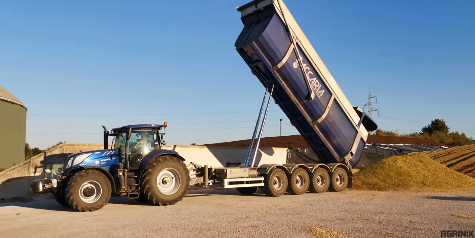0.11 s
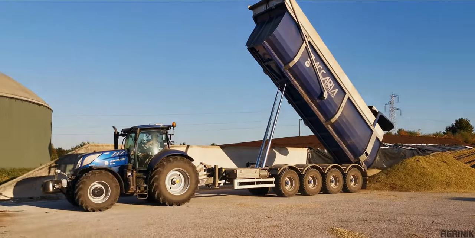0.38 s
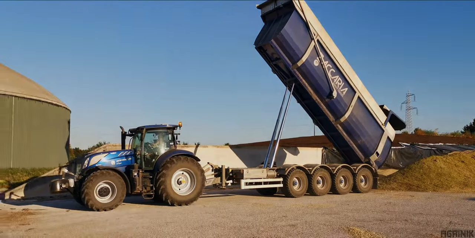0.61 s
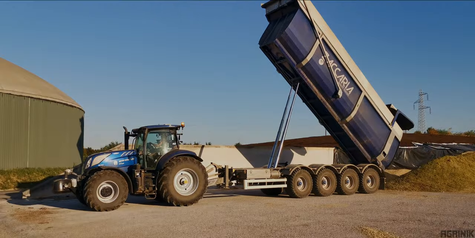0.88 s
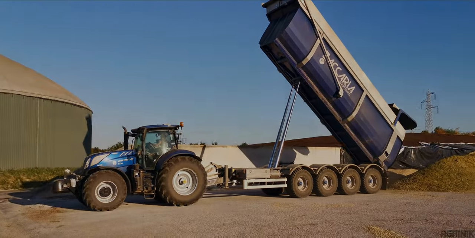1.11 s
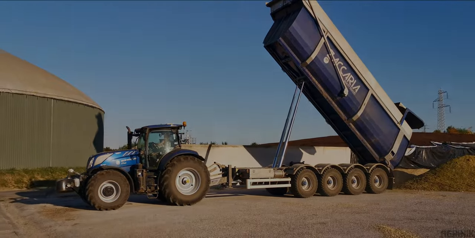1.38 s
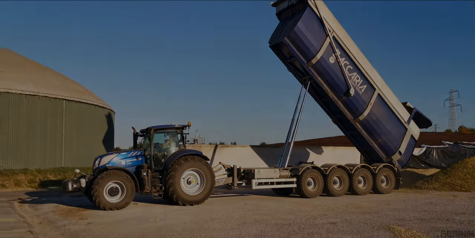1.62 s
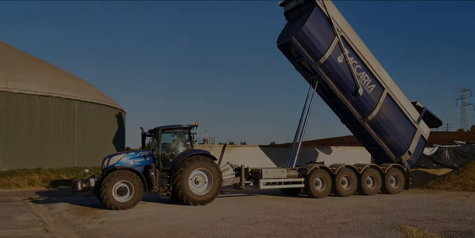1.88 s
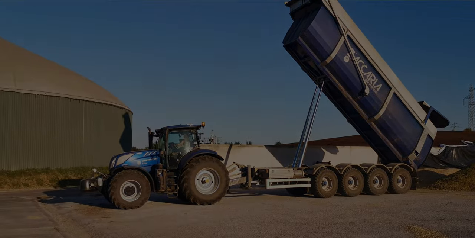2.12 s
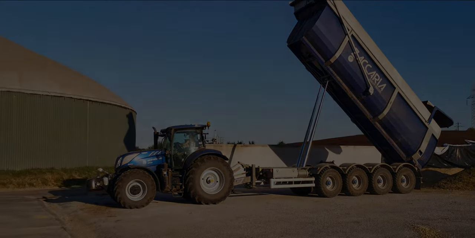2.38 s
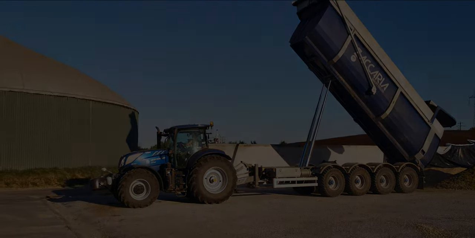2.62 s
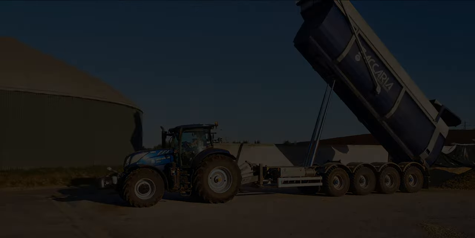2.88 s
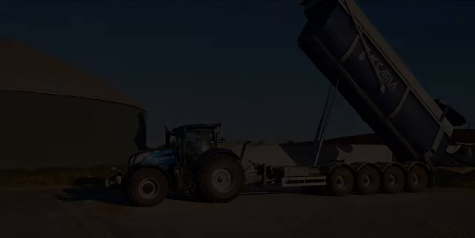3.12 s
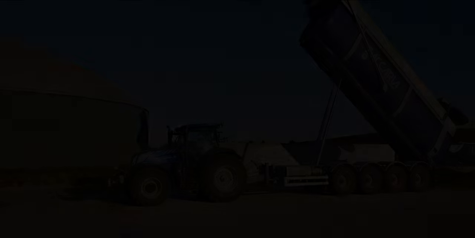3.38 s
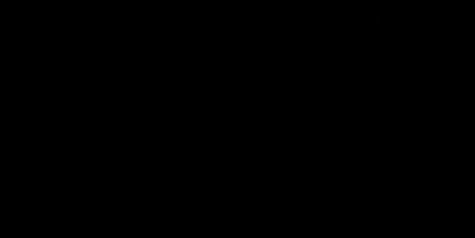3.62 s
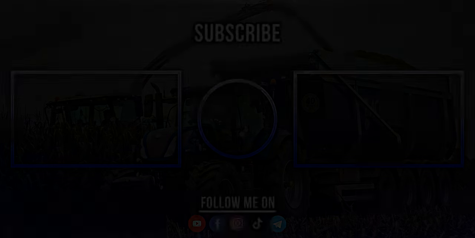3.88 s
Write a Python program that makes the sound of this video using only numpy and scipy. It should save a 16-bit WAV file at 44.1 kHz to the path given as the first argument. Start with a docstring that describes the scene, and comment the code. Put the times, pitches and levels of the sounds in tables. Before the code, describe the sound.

A tractor diesel engine revs up from idle to a deep roar, then fades to silence

```python
"""An open yard: a six-cylinder diesel tractor revs up from idle and pulls away with its trailer.
Sine-tone exhaust beats rise over a filtered-noise roar with pipe resonances, block clatter with ringing
panels and turbo hiss. A two-tone hum keeps its own pitch; narrow whines, low surges, bright rushes and
a faint top hiss fill in. The fader closes along a curve to silence."""
import sys
import numpy as np
from scipy import signal
from scipy.io import wavfile
from scipy.ndimage import uniform_filter1d

SR = 44100
rng = np.random.default_rng(int(sys.argv[2]) if len(sys.argv) > 2 else 0)


def generate_wav(sig):
    """Save sig (samples, or channels by samples) to the path in sys.argv[1] as 16-bit PCM at SR."""
    pcm = np.round(np.clip(np.atleast_2d(sig).T, -1, 1) * 32767).astype(np.int16)
    wavfile.write(sys.argv[1], SR, pcm)


def natural_amplitude(level_db):
    """Convert a level in decibels to a linear amplitude factor, elementwise."""
    exponent = np.asarray(level_db, float) / 20
    return 10 ** exponent


N = 176400  # 4 s

# engine run: t/s, mean firing rate f/Hz, exhaust beat level/dB, its octave level/dB, load/0-1, clatter gain/dB
ENGINE_RUN = [(0, 44.1, -35, -33, 0.03, -1), (.3, 43.65, -28, -32.5, 0.22, -1.5),
              (.42, 45.05, -23.5, -44, 0.16, -0.5), (.55, 47.45, -31, -36, 0.05, 0.5),
              (.78, 48.1, -37, -46, 0.24, 0), (.92, 49.34, -26.5, -32.5, 0.25, 0),
              (1.05, 53.6, -17.5, -16, 0.31, -1.5), (1.17, 58.54, -18.5, -15, 0.2, -1),
              (1.2, 60.5, -29, -16, 0.7, -2), (1.23, 61.66, -29, -14.5, 0.6, -1),
              (1.27, 64.4, -18.5, -21.5, 0.54, -2), (1.32, 66.13, -17, -29, 0.44, -2),
              (1.37, 70.22, -35.5, -20, 0.5, -1), (1.44, 75.2, -28.5, -22, 0.3, 0.5),
              (1.5, 78.8, -20.5, -25, 0.52, 0.5), (1.66, 80.76, -17.5, -21.5, 0.37, 0),
              (1.71, 81.3, -37.5, -28, 0.75, 0.5), (1.82, 83.86, -28.5, -37, 0.75, 0.5),
              (1.89, 86, -15.5, -38, 0.81, 1), (2.02, 88.1, -11, -18, 0.97, 1),
              (2.15, 87.8, -14, -31.5, 0.98, -1), (2.3, 91.13, -12.5, -24, 0.86, 0),
              (2.38, 90.85, -14, -22, 1, 0), (2.5, 88.9, -17, -13.5, 0.95, -1),
              (2.68, 86.34, -25.5, -40, 0.88, -0.5), (2.82, 87.65, -16, -33, 0.86, 0),
              (3.0, 86.75, -25, -17, 0.87, -1), (3.2, 87.5, -13.5, -30, 1, -0.5),
              (3.58, 85.1, -10.5, -16.5, 0.76, -2)]


def evened(x):
    """Scales to rms 1."""
    return x / np.sqrt(np.mean(x ** 2) + 1e-20)


def column(table, order, t):
    """Reads one column of a time table, with straight lines between its rows."""
    rows = np.array(table, float)
    return np.interp(t, rows[:, 0], rows[:, order])


def read(points, hz):
    """Reads a spectrum on a log-frequency axis."""
    f, value = np.transpose(points)
    return np.interp(np.log(hz + 1), np.log(f + 1), value)


def unit(points, hz):
    """Spectrum in dB, scaled to a common total power so that only its colour counts."""
    db = read(points, hz)
    return db - 10 * np.log10(np.sum(natural_amplitude(db) ** 2) * 2)


def slow(rate_hz):
    """Slow random drift of rms 1: sixteen sines up to rate_hz, the slower ones stronger."""
    t = np.arange(0, N + 256, 256) / SR
    wave = 0
    for f in np.geomspace(rate_hz / 10, rate_hz, num=16):
        wave = wave + np.sin(2 * np.pi * (f * t + rng.random())) / np.sqrt(f)
    return np.interp(np.arange(N) / SR, t, evened(wave))


def fuzzy(hz, width_hz, steady=0):
    """Noise through a triple resonance that follows the curve hz; steady 0-1 evens it towards a tone."""
    r = np.exp(-np.pi * width_hz * 1.3 / SR)  # each pass is wider, as three in a row narrow the band
    z = rng.standard_normal(len(hz)) + 1j * rng.standard_normal(len(hz))
    for _ in range(3):
        z = signal.lfilter([1 - r], [1, -r], z)
    z = z / (abs(z) + 1e-9) ** steady
    carrier = np.exp(2j * np.pi * np.cumsum(hz) / SR)
    return evened((z * carrier).real)


def noise(field_db, size, patchy_db):
    """Random short-time spectra shaped by field_db(Hz, s), with drifting patches."""
    hop = size // 4
    frames, hz = N // hop + 5, np.fft.rfftfreq(size, 1 / SR)
    real, imaginary, patches = rng.standard_normal((frames, len(hz), 3)).T
    patches = uniform_filter1d(patches, size=10, axis=0)  # across frequency
    patches = evened(uniform_filter1d(patches, size=8, axis=1))  # across time
    level_db = field_db(hz[:, None], np.arange(frames) * hop / SR) + patchy_db * patches
    z = (real + 1j * imaginary) * natural_amplitude(level_db)
    # the last factor makes up for the power lost where random frames overlap
    return signal.istft(z, nperseg=size, noverlap=size - hop)[1][:N] * np.sqrt(1.5)


def exhaust(t, firings):
    """Firing beat and octave as clean sines, with weaker upper orders that wander in level."""
    # upper orders: multiple of firing rate, level at full load and steady speed/dB
    upper_orders = [(2.5, -39), (3, -38), (3.5, -40), (4, -36), (4.5, -40), (5, -38), (6, -40)]
    idle_offset_db, wander_db = -0.5, 4.5
    rev_gain_db = .17  # per Hz/s of speed-up
    beat = natural_amplitude(column(ENGINE_RUN, 2, t)) * np.sin(2 * np.pi * firings)
    octave = natural_amplitude(column(ENGINE_RUN, 3, t)) * np.sin(4 * np.pi * firings + 1)
    out = beat + octave
    speed_up = uniform_filter1d(np.gradient(column(ENGINE_RUN, 1, t)) * SR, size=8000)  # Hz/s
    offset_db = idle_offset_db * (1 - column(ENGINE_RUN, 4, t)) + rev_gain_db * np.clip(speed_up, 0, 35)
    for k, db in upper_orders:
        level = natural_amplitude(db + offset_db + wander_db * slow(6))
        out += level * np.sin(2 * np.pi * (k * firings + rng.random()))
    return np.sqrt(2) * out  # table levels are rms


def uneven(firings):
    """Gain of the gas flow: one part of the cylinder order is stronger, and each firing differs."""
    cycle_depth, spread_db = .15, 1.2
    draws = rng.standard_normal(round(firings[-1]) + 2)
    chance = np.interp(firings, np.arange(len(draws)), draws)
    cycle = 1 + cycle_depth * np.cos(2 * np.pi * firings / 3)  # once per three firings
    return evened(natural_amplitude(spread_db * chance) * cycle)


def roar(firings):
    """Exhaust roar as noise: darker and louder under load, puffing with each firing."""
    # colour of the roar at idle: f/Hz, relative level per Hz/dB
    roar_idle = [(15, -33.5), (25, 3), (76, -6), (119, 7), (195, -7), (245, 0), (378, -7), (492, -7),
                 (757, -7.5), (1000, -11.5), (1300, -45.5), (2200, -120)]
    # colour of the roar at full load: f/Hz, relative level per Hz/dB
    roar_load = [(15, -60), (25, -22), (60, -16), (91, -5.5), (134, -6), (253, -6), (314, -5.5),
                 (462, -12.5), (669, -16.5), (1000, -21.5), (1300, -52), (2200, -120)]
    idle_db, load_db, puff_depth = -23, -9.5, .1

    def field(hz, s):
        load = column(ENGINE_RUN, 4, s)
        return (1 - load) * (unit(roar_idle, hz) + idle_db) + load * (unit(roar_load, hz) + load_db)

    puffs = 1 + puff_depth * np.cos(2 * np.pi * firings)
    return noise(field, size=2048, patchy_db=0.5) * puffs


def pipe(t):
    """Resonances of the exhaust pipe as fuzzy bands that grow with load."""
    # pipe resonances: f/Hz, width/Hz, mean level at full load/dB
    pipe_bands = [(167.2, 72, -29), (253.2, 26, -27.5), (314.5, 50, -22), (424, 80, -29.5)]
    idle_db, wander_db = -10, 3
    load_db = idle_db * (1 - column(ENGINE_RUN, 4, t))
    out = np.zeros(N)
    for hz, width_hz, db in pipe_bands:
        out += natural_amplitude(db + load_db + wander_db * slow(8)) * fuzzy(np.full(N, float(hz)), width_hz)
    return out


def clatter(t, firings):
    """Block and drive-line noise with ringing panels, pulsing twice per firing; duller from further off."""
    # colour of the clatter at idle, close by: f/Hz, relative level per Hz/dB
    near_colour = [(290, -31), (500, -7), (844, 0), (953, -10), (1130, -1.5), (1630, -8.5), (1860, -6),
                   (2230, -12), (2490, -7.5), (2710, -12), (3060, -9), (3380, -14.5), (4570, -18),
                   (7170, -18), (7810, -15.5), (9150, -35), (11900, -54), (20100, -120)]
    # colour of the clatter at speed, further off: f/Hz, relative level per Hz/dB
    far_colour = [(290, -33), (500, -4.5), (551, -4.5), (678, -5.5), (747, -3.5), (854, -17.5), (988, -5.5),
                  (1120, -6.5), (1390, -8), (2130, -14), (2490, -12.5), (3630, -22.5), (6430, -22),
                  (7530, -19.5), (8400, -47), (9150, -36.5), (11900, -72), (20100, -120)]
    # tractor drawing away: t/s, share of the far colour/0-1
    drawing_away = [(0, 0.088), (1.0, 0.041), (1.6, 0.38), (2.2, 0.75), (2.8, 1), (3.6, 1)]
    # ringing panels: f/Hz, width/Hz, level close by, ahead of the clatter gain/dB
    panels = [(827, 81, -41.5), (1088, 120, -38), (3050, 240, -46.5), (5360, 210, -47.5), (6900, 300, -45)]
    near_db, far_db, pulse_depth = -20.5, -20, .1

    def field(hz, s):
        far = np.clip(column(drawing_away, 1, s), 0, 1)
        return (1 - far) * (unit(near_colour, hz) + near_db) + far * (unit(far_colour, hz) + far_db)

    body = noise(field, size=512, patchy_db=1.0)
    for hz, width_hz, db in panels:
        level = natural_amplitude(db + 2.5 * slow(8) - 2.9 * column(drawing_away, 1, t))
        body += level * fuzzy(np.full(N, float(hz)), width_hz)
    gain = natural_amplitude(column(ENGINE_RUN, 5, t) + 0.23 * slow(22))
    return body * gain * (1 + pulse_depth * np.cos(4 * np.pi * firings))


def turbo(t):
    """Broad hissing whistle near 7 kHz that comes up as the turbo spools."""
    # turbo whistle: t/s, centre f/Hz, mean level/dB
    whistle = [(0, 6940, -53), (.5, 6900, -62), (.7, 6610, -37), (1.0, 7330, -37.5), (1.5, 7521, -36.5),
               (1.9, 7370, -41.5), (2.3, 7400, -37.5), (3.58, 7355, -41.5)]
    level = natural_amplitude(column(whistle, 2, t) + 0.89 * slow(25))
    return level * fuzzy(column(whistle, 1, t), width_hz=1120)


def hum(t):
    """Sine hum with its octave that does not follow the engine speed."""
    # hum: t/s, f/Hz, mean level/dB, mean octave level/dB
    hum_track = [(0, 196.6, -28, -35.5), (.5, 194.3, -29, -36), (.9, 189.5, -32.5, -35.5),
                 (1.3, 186.8, -28, -42), (1.7, 187, -42, -35.5), (2.1, 192, -32.5, -26),
                 (2.7, 189.1, -34, -25), (3.58, 183.4, -33, -23)]
    wander_db = 2
    phase = 2 * np.pi * np.cumsum(column(hum_track, 1, t)) / SR
    low = natural_amplitude(column(hum_track, 2, t) + wander_db * slow(8))
    high = natural_amplitude(column(hum_track, 3, t) + wander_db * slow(8))
    return np.sqrt(2) * (low * np.sin(phase) + high * np.sin(2 * phase))


def swells(rows, levels_db):
    """Gliding bands of resonant noise that swell and go, each under a rounded sine arch."""
    tone_under_hz = 70  # narrower bands hold their level more like a tone
    run_in = SR // 10  # lets the resonance settle before it is heard
    out = np.zeros(N)
    for (start, length, from_hz, to_hz, width_hz), db in zip(rows, levels_db):
        u = np.arange(0, 1, 1 / (length * SR))
        at = round(start * SR)
        glide = np.pad(from_hz + (to_hz - from_hz) * u, (run_in, 0), "edge")
        steady = np.clip(1 - width_hz / tone_under_hz, 0, 1)
        band = fuzzy(glide, width_hz, steady)[run_in:]
        out[at:at + len(u)] += natural_amplitude(db) * np.sin(np.pi * u) ** 0.56 * band
    return out


def surges():
    """The exhaust roar surges briefly, in one low band at a time or several together."""
    # surges: start t/s, length/s, from f/Hz, to f/Hz, width/Hz
    surge_rows = [(0, .16, 135, 128, 20), (1.29, .06, 150, 170, 60), (1.36, .14, 270, 320, 40),
                  (1.7, .12, 300, 300, 40), (1.88, .32, 450, 420, 110), (1.86, .2, 560, 540, 60),
                  (2.3, .2, 370, 400, 80), (1.95, .12, 180, 160, 30), (2.3, .13, 170, 165, 30),
                  (2.7, .28, 250, 252, 10), (2.96, .14, 165, 165, 30), (.4, .25, 108, 112, 20)]
    # their levels at the top of the swell: level/dB
    surge_db = [-22.5, -14.5, -23.5, -25.5, -18.5, -26, -20.5, -18, -11.5, -15, -14, -25]
    return swells(surge_rows, surge_db)


def whines():
    """Mostly narrow, slightly fuzzy whines that swell and go."""
    # whines: start t/s, length/s, from f/Hz, to f/Hz, width/Hz
    whine_rows = [(.53, .15, 2470, 2600, 10), (.58, .3, 820, 880, 15), (.34, .18, 5550, 5650, 150),
                  (.81, .05, 2410, 2420, 20), (1.03, .11, 2600, 2575, 10), (.86, .22, 780, 800, 25),
                  (0, .5, 3030, 3100, 190), (1.62, .16, 3000, 3060, 70), (.83, .07, 4250, 4200, 30),
                  (2.14, .1, 2520, 2520, 60), (2.95, .65, 640, 670, 120), (2.85, .75, 2000, 2000, 160),
                  (1.28, .32, 8700, 9000, 700)]
    # their levels at the top of the swell: level/dB
    whine_db = [-34.5, -32.5, -45, -38, -34, -35, -41, -41, -44, -37, -27, -36, -54]
    return swells(whine_rows, whine_db)


def rushes(t):
    """Brief bright rushes of noise over the clatter, each under a bell-shaped envelope."""
    # rushes: peak t/s, length between the 1/e points/s, peak level/dB
    rush_rows = [(.84, .075, -33), (.52, .05, -35)]
    # colour of the rushes: f/Hz, relative level/dB
    rush_colour = [(1500, -29.5), (2200, -3.5), (4000, -4), (5500, -14), (10000, -28), (12000, -61.5)]
    shape = sum(natural_amplitude(db) * np.exp(-((t - s) / length) ** 2 * 4) for s, length, db in rush_rows)
    # 0 * s holds the colour over all frames
    return shape * noise(lambda hz, s: unit(rush_colour, hz) + 0 * s, size=256, patchy_db=1.5)


def air(t):
    """Faint top hiss that flickers as a whole and shares the clatter gain."""
    # colour of the hiss: f/Hz, relative level per Hz/dB
    hiss_colour = [(8500, -32), (9800, -8.5), (11000, -7), (12500, -10.5), (14500, -13), (15300, -18),
                   (17000, -50.5)]
    mean_db, flicker_db = -66, .8  # mean ahead of the clatter gain
    hiss = noise(lambda hz, s: unit(hiss_colour, hz) + 0 * s, size=256, patchy_db=1.2)
    return natural_amplitude(mean_db + column(ENGINE_RUN, 5, t) + flicker_db * slow(70)) * hiss


def scene():
    """The tractor in the open: one slightly wandering firing count drives exhaust, roar and clatter."""
    t = np.arange(N) / SR
    speed_wander = 0.0037  # rms share of the firing rate
    firing_hz = column(ENGINE_RUN, 1, t) * (1 + speed_wander * slow(10))
    firings = np.cumsum(firing_hz) / SR
    mix = exhaust(t, firings)
    mix += uneven(firings) * (roar(firings) + pipe(t))
    mix += clatter(t, firings) + turbo(t) + hum(t)
    mix += surges() + whines() + rushes(t) + air(t)
    return mix[None]


def band_limit(x):
    """A steep low-pass at the top of the band."""
    return signal.sosfilt(signal.butter(12, 15140, fs=SR, output="sos"), x)


def record(dry):
    """The fader closes along a square curve and is cut just before it reaches zero."""
    t = np.arange(N) / SR
    fade_from_s, fade_to_s, cut_s, cut_len_s = 1.57, 3.8, 3.57, 0.0045
    fader = np.clip((fade_to_s - t) / (fade_to_s - fade_from_s), 0, 1) ** 2
    cut = np.clip((cut_s - t) / cut_len_s, 0, 1)
    return band_limit(dry * fader * cut)


dry = scene()
out = record(dry)
generate_wav(out)
```